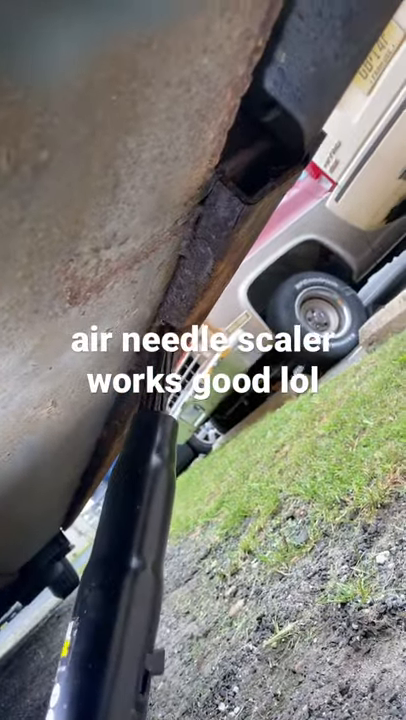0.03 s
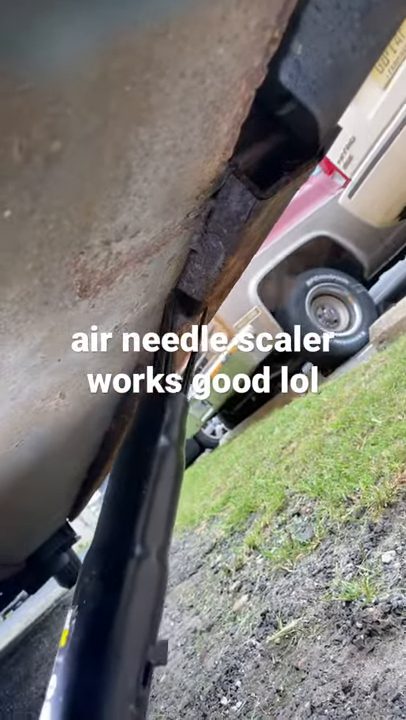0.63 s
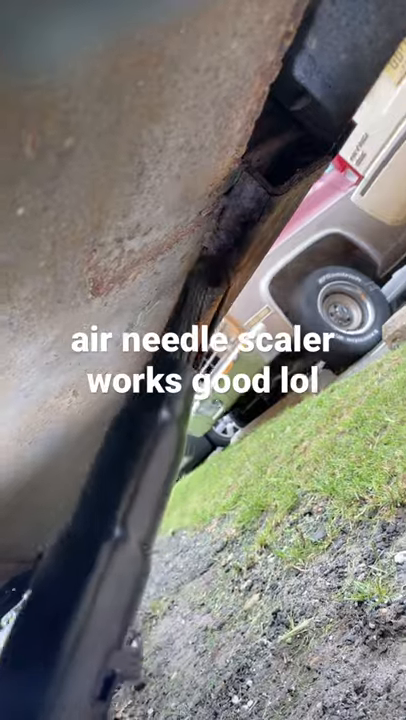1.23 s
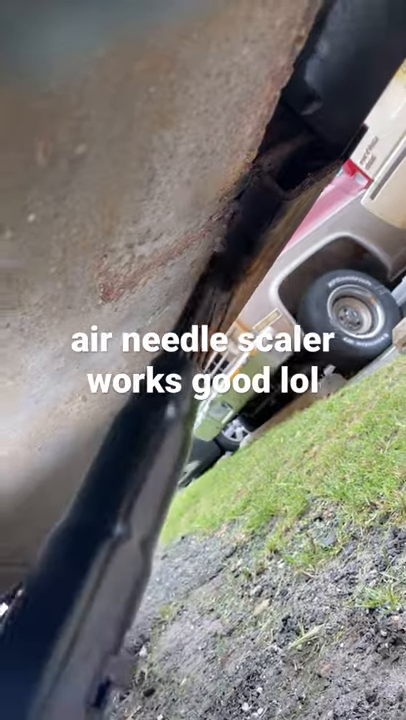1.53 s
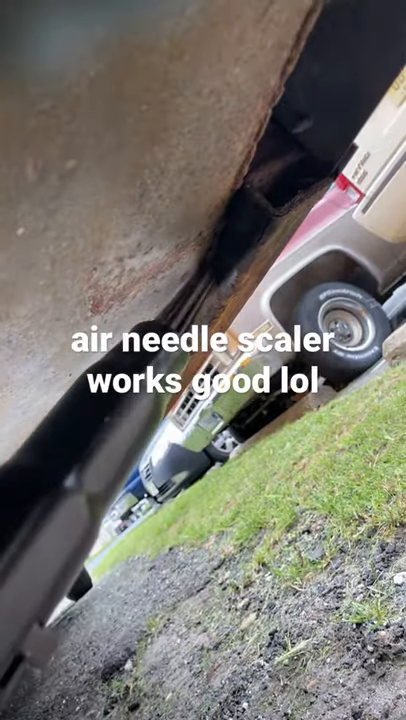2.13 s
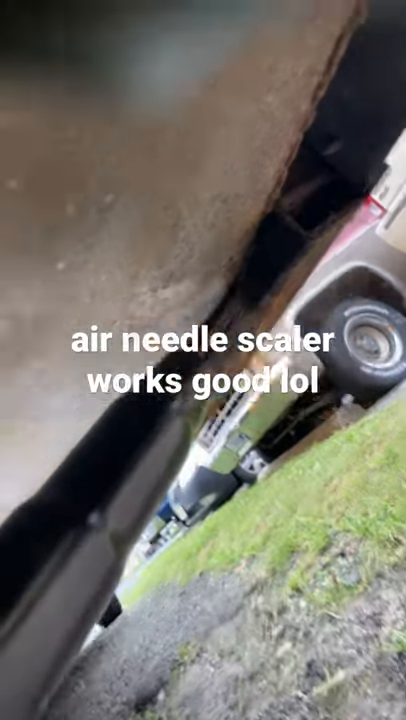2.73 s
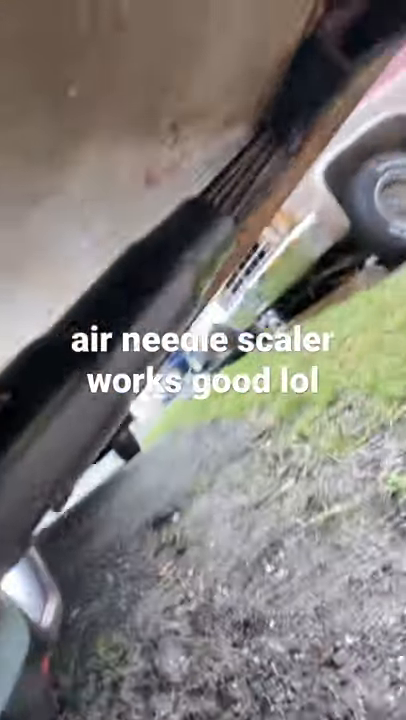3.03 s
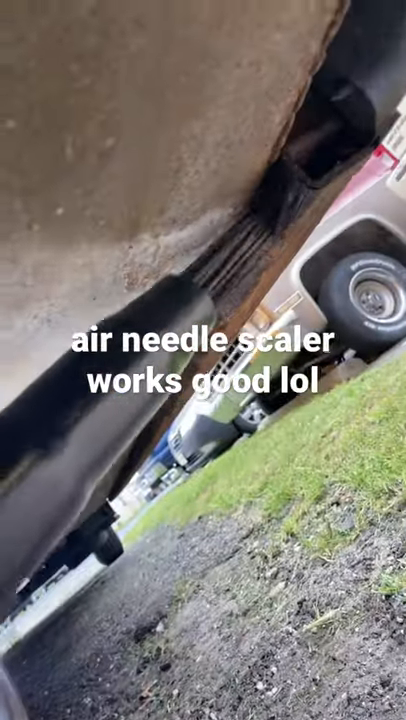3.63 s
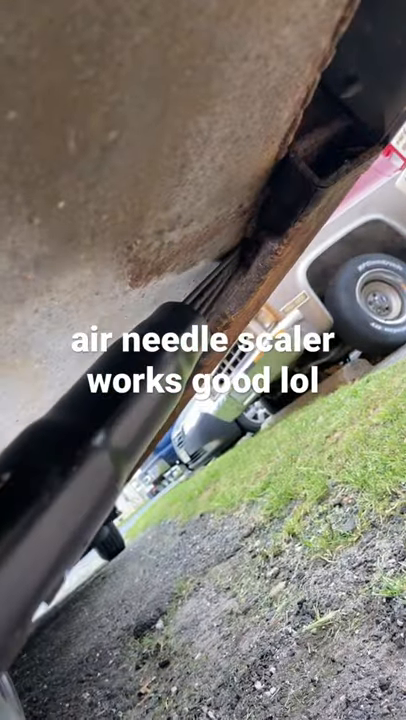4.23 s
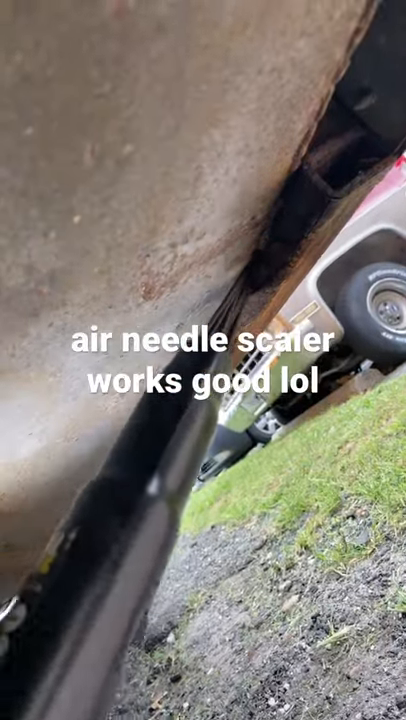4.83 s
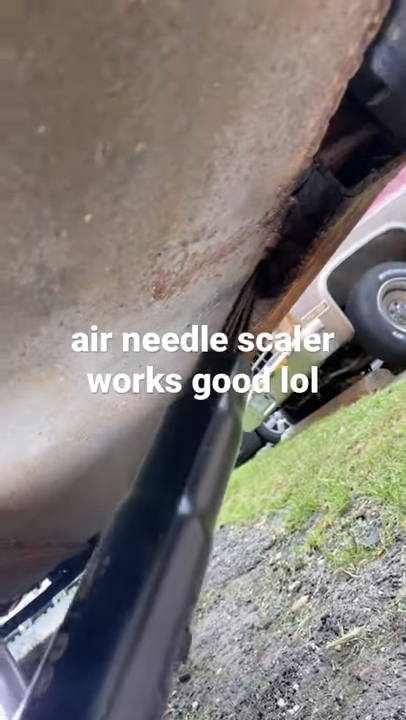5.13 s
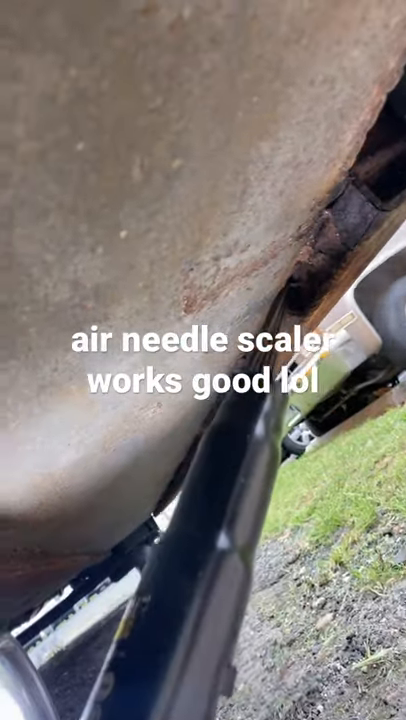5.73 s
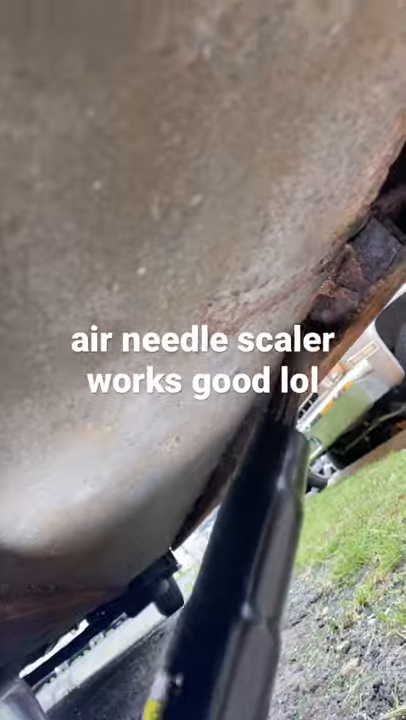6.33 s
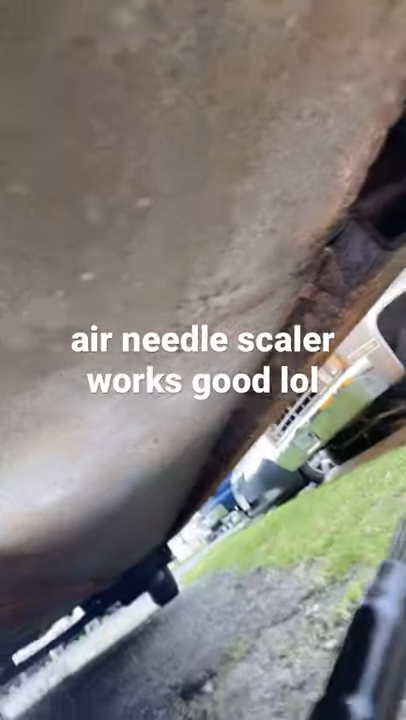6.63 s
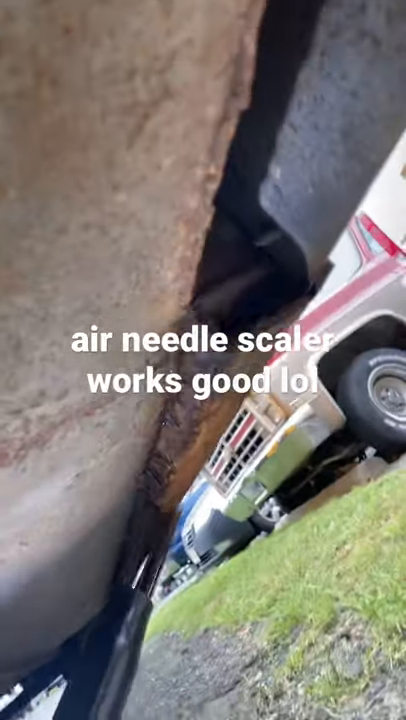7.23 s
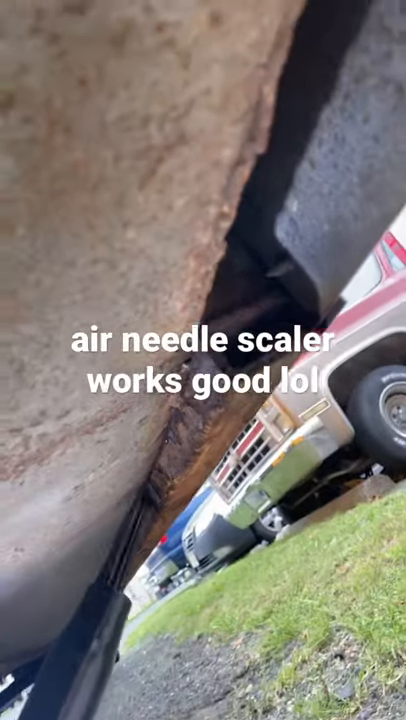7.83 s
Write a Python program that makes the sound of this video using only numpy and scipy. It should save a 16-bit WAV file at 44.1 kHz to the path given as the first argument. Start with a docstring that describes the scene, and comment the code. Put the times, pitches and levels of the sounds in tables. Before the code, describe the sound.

Rapid pneumatic hammering on rusty sheet metal outdoors, with bright needle clatter, hissing air and occasional dull thumps.

```python
"""An air needle scaler chips rust off the underside of a vehicle, outdoors, about an arm's length away.
Its piston strikes about 73 times a second and slows twice as the trigger eases. Each blow knocks the
sheet steel, throws a bundle of ringing needles against it and lets out a puff of air. Now and then
the needles bite and the panel thumps. Behind it are a thin whistle from the valve, faint open-air
noise and, at the very start, a low hum and rumble."""
import sys
import numpy as np
from scipy import signal
from scipy.fft import rfft, irfft, next_fast_len
from scipy.io import wavfile
from scipy.ndimage import uniform_filter1d

SR = 44100
rng = np.random.default_rng(int(sys.argv[2]) if len(sys.argv) > 2 else 0)


def file_out(sig):
    """Save sig as 16-bit WAV at sys.argv[1]."""
    # one column per channel
    cols = np.atleast_2d(sig).T
    # limit, then scale
    lim = np.clip(cols, -1, 1)
    pcm = np.round(lim * 32767).astype(np.int16)
    wavfile.write(sys.argv[1], SR, pcm)


N = 356328
TIME = np.arange(N) / SR

# piston speed during the first pull of the trigger: t/s, rate/Hz
FIRST_PULL_RATE = [(0.106, 42.27), (0.134, 50.74), (0.184, 76.69), (1.009, 74.48), (1.636, 74.46),
                   (1.668, 52.71), (1.735, 31.39)]
# piston speed during the second pull: t/s, rate/Hz
SECOND_PULL_RATE = [(1.816, 70.86), (1.892, 76.77), (2.189, 70.88), (2.245, 73.71), (4.091, 73.51),
                    (5.55, 71.21), (5.653, 70.2), (6.415, 72.18), (6.46, 75.31), (6.725, 72.42),
                    (6.882, 46.14), (6.993, 50.97), (7.061, 76.72), (7.305, 72.46), (8.08, 74.08)]
# limp strokes at low air pressure, next to a full blow: t/s, level/dB
WEAK_TAPS = [(0.079, -8.5), (0.095, -11), (1.765, -12.5), (1.799, -10.5)]
# air stored in the hose drives the first blows of a pull harder: t/s, boost/dB
HOSE_SURGES = [(0.101, 8), (1.812, 1)]
# how the hand holds the tool: t/s, push on the panel/dB, touch on its stiff edge/dB, needle clatter/dB
HAND_CONTACT = [(0.3, -27, -24.5, -25.5), (1.0, -26, -26, -26.5), (1.55, -23, -23.5, -24),
                (2.1, -26.5, -23.5, -26.5), (2.9, -26, -24.5, -26.5), (3.55, -25.5, -26.5, -24),
                (4.1, -26.5, -24.5, -26), (4.85, -26.5, -26, -26), (5.1, -25.5, -26.5, -23),
                (5.75, -25, -27, -23.5), (6.45, -27, -28.5, -24.5), (6.75, -31, -35.5, -25.5),
                (7.05, -31.5, -34, -27.5), (8.07, -32.5, -34, -27.5)]
# the needles dig in, so the panel flexes and the steel rings more: middle/s, half length/s, extra flex/dB
NEEDLE_DIGS = [(3.547, 0.3, 10), (5.8, 0.62, 12), (6.45, 0.049, 11)]
# the needles bite and kick the panel: t/s, relative level/dB
BITE_KICKS = [(0.078, -23), (0.103, -10.5), (0.126, -11), (0.922, -14.5), (1.33, -15.5), (1.383, -16.5),
              (1.514, -15), (1.561, -15.5), (2.432, -19), (2.814, -16.5), (2.939, -15.5), (3.108, -16.5),
              (3.237, -17), (3.371, -19), (3.579, -23), (3.718, -11), (4.011, -14), (4.17, -21),
              (4.625, -14), (4.971, -13), (5.134, -18), (5.304, -22), (5.485, -13.5), (5.558, -13),
              (5.706, -14), (5.761, -21), (6.133, -22), (6.341, -16), (6.43, -19), (6.488, -17)]
# notes that come and go with the tool's angle, mostly of the needles, the two lowest (near 1.4 and 1.5 kHz) of
# the tool's body: start/s, end/s, f/Hz, width/Hz, level/dB; a row that ends before it starts is silent
SHIFTING_NOTES = [(0.1, 1.9, 11900, 1000, -27), (0.1, 2.8, 2880, 200, -39.5), (1.69, 1.79, 10210, 45, -29),
                  (1.8, 2.9, 7470, 121, -29), (0.1, 2.9, 5600, 495, -34), (3.0, 5.0, 4090, 200, -36.5),
                  (3.1, 4.7, 3080, 170, -32.5), (3.4, 3.75, 7510, 120, -28.5), (3.9, 6.5, 1510, 130, -34.5),
                  (4.9, 6.55, 4020, 1000, -37), (4.98, 6.56, 6230, 101, -32), (4.98, 3.3, 7600, 600, -36.5),
                  (6.55, 7.05, 1390, 150, -32), (6.75, 9.0, 2940, 80, -36.5)]
# notes of the tool's own steel: f/Hz, time to fade by 60 dB/s, level/dB
TOOL_NOTES = [(6130, 0.034, -41), (7260, 0.027, -39), (7900, .016, -58), (10250, 0.048, -42.5),
              (11370, 0.016, -41), (12500, .035, -40.5)]
# tone of the wide panel: f/Hz, level/dB
PANEL_TONE = [(200, -26), (385, -25), (430, -3.5), (570, 2), (680, -2), (780, 0), (900, -4.5), (1050, -5),
              (1400, -24.5), (2500, -37)]
# tone of the hammer's knock: f/Hz, level/dB
HAMMER_TONE = [(600, -29), (950, -4), (1150, -4), (1330, -1), (1500, 0), (1750, -7), (2000, -5.5),
               (3000, -38)]
# tone of the stiff edge: f/Hz, level/dB
EDGE_TONE = [(1300, -21), (1850, 17), (2080, 15), (2350, 18), (2700, 15), (3050, 10), (3300, 5),
             (3600, -9.5), (6000, -37.5)]
# deep tone of the flexing panel: f/Hz, level/dB
FLEX_TONE = [(25, -43), (45, -21), (70, -0.5), (140, -1.5), (250, -2), (400, -7.5), (700, -17), (1500, -44)]
# bright clatter of the needle tips: f/Hz, level/dB
CLATTER_TONE = [(2500, -11.5), (3600, -10), (4300, -2.5), (5400, -2), (6200, 2.5), (6900, 0), (7900, 6.5),
                (8700, -4), (10000, -3.5), (13000, -24)]
# their highest sizzle: f/Hz, level/dB
SIZZLE_TONE = [(7000, -28), (9000, -2.5), (10200, -2), (10800, -4.5), (11500, -5), (13000, -5),
               (14000, -9.5), (15800, -18)]
# thump of a bite: f/Hz, level/dB
BITE_TONE = [(25, -31), (45, -15), (80, 0), (150, -3), (300, -9), (600, -9), (1500, -26)]
# open-air noise: f/Hz, level/dB
OUTDOOR_TONE = [(25, -58), (80, 6), (300, 6.5), (900, 4), (2000, 1), (4000, -20), (8000, -25), (15000, -13)]
# rumble at the start: f/Hz, level/dB
RUMBLE_TONE = [(30, -16), (130, -6), (450, -10), (900, -11.5), (3000, -23), (15000, -35)]


def piston(jitter_s=.00007, spread_db=0.72):
    """Air drives the piston: one blow per stroke, plus a few limp taps. Gives their times and sizes."""
    times = []
    for pull in (FIRST_PULL_RATE, SECOND_PULL_RATE):
        s, rate = np.transpose(pull)
        t = TIME[(TIME >= s[0]) & (TIME <= s[-1])]
        strokes = np.cumsum(np.interp(t, s, rate)) / SR
        times.extend(np.interp(np.arange(int(strokes[-1]) + 1), strokes, t))
    tap_s, tap_db = np.transpose(WEAK_TAPS)
    db = np.r_[np.zeros(len(times)), tap_db]
    times = np.r_[times, tap_s]
    timing, force = rng.standard_normal((len(times), 2)).T
    return times + jitter_s * timing, undb(db + spread_db * force)


def needles(times, sizes, count=19, flight_s=.0075, fade_s=0.0059, drift_s=.0003, jitter_s=.00005):
    """Each needle lands after its own flight, which drifts as the tool moves; late ones land softer."""
    lateness = (np.arange(count) + rng.random(count)) / count
    drift, jitter, force = rng.standard_normal((3, len(times), count))
    flight = np.abs(flight_s * lateness ** 1.3 + drift_s * wander(drift) + jitter_s * jitter)
    # a needle leans to one side for a while, then flips over
    lean = np.sign(uniform_filter1d(rng.standard_normal(flight.shape), size=30, axis=0))
    fade = fade_s * 0.53 ** seated(times)[:, None]  # in a seated bundle, late needles are softer still
    push = lean * np.exp(-flight / fade) * undb(3.5 * force)
    push /= np.linalg.norm(push, axis=1, keepdims=True)  # the needles share the energy of one blow
    return unit(clicks(times[:, None] + flight, sizes[:, None] * push))


def rebound(times, sizes, delay_s=.0045, drift_s=0.000896):
    """The bundle falls back on the anvil just after each blow; the delay wanders slowly from blow to blow."""
    drift = wander(rng.standard_normal(len(times)), blows=30)
    return unit(clicks(times + delay_s + drift_s * drift, sizes))


def sheet_steel(times, sizes, landings, panel, hammer, edge, flex, grip_db=4.0, slip_s=0.00019):
    """The blow runs through the sheet as a bending wave, highs first; the needles rattle it after."""
    slip, grip, bend = rng.standard_normal((len(times), 3)).T
    knock = unit(clicks(times, sizes)) + undb(-8.5) * rebound(times, sizes)
    turnaround = unit(clicks(times - 0.003, sizes))  # the piston turns round just before each blow
    knock += undb(-12) * wash(turnaround, t60=0.021)
    rattle = unit(landings + undb(1) * echoes(landings, t60=0.048) + undb(0.5) * wash(landings, t60=0.12))
    # the loose, wide panel never answers twice alike, and the grip on it differs from blow to blow
    shake = unit(undb(-5.5) * landings + wash(landings, t60=0.029))
    shove = unit(clicks(times + slip_s * slip, sizes * undb(grip_db * grip)))
    heave = unit(clicks(times, sizes * (1 + 2.5 * bend)))
    out = panel * unit(colour(shove + undb(-0.5) * shake, PANEL_TONE, lag=0.97))
    out += hammer * unit(colour(knock + undb(-2) * rattle, HAMMER_TONE, lag=0.41))
    out += edge * unit(colour(knock + undb(2) * rattle, EDGE_TONE, lag=0.37))
    return out + flex * unit(colour(heave + undb(-5) * shake, FLEX_TONE, lag=1.223))


def needle_tips(times, sizes, landings, bounces, air, clatter, sizzle, seated_db=5):
    """The tips crack on the rust and bounce, mixed with the hiss of spent air."""
    # needles already resting on the steel crack right at the blow, harder when the bundle is seated
    blows = unit(clicks(times, sizes * undb(seated_db * seated(times))))
    strikes = unit(undb(-5.5) * blows + landings + undb(6.5) * echoes(landings, t60=0.0041))
    tail = undb(1.5) * echoes(landings, t60=0.071)
    chatter = undb(-4) * wash(bounces, t60=0.036)
    cracks = unit(strikes + tail + undb(-1) * air + chatter)
    return clatter * unit(colour(cracks, CLATTER_TONE)) + sizzle * unit(colour(cracks, SIZZLE_TONE))


def ringing_steel(landings, needle_gain, tool_gain, fade_s=0.058):
    """Every landing sets the needles and the tool ringing at their own notes."""
    crack = unit(wash(landings, t60=0.0022))
    out = np.zeros(N)
    for start, end, hz, width, db in SHIFTING_NOTES:
        near_note = ring(crack, hz, 4 * width)  # each note takes up only the sound near itself
        out += undb(db) * needle_gain * gate(TIME, start, end, fade_s) * ring(near_note, hz, width)
    for hz, t60, db in TOOL_NOTES:
        out += undb(db) * ring(tool_gain * crack, hz, width_hz=np.log(1000) / (np.pi * t60))
    return out


def exhaust(times, sizes, puff_s=0.016):
    """A puff of air leaves the tool on every stroke and dies away."""
    puffs = signal.lfilter([1], [1, -np.exp(-1 / (puff_s * SR))], clicks(times, sizes))
    return unit(puffs * rng.standard_normal(N))


def bites():
    """A hard kick bends the whole panel: a thump that falls in pitch and shudders on."""
    s, db = np.transpose(BITE_KICKS)
    kicks = clicks(s, undb(db))
    shudder = ring(wash(kicks, t60=0.13), hz=156, width_hz=320)
    thumps = unit(colour(kicks, BITE_TONE, lag=1.323, slowest_hz=40.6))
    return undb(-38) * thumps + undb(-39.5) * shudder


def air_supply(full_rate_hz=71.3, run_up_s=0.18, surge_s=0.12):
    """How far the piston has slowed for lack of air (octaves), and the hose's fading boost (dB)."""
    rate = np.interp(TIME, *np.transpose(np.r_[FIRST_PULL_RATE, SECOND_PULL_RATE]))
    slowing = np.maximum(np.log2(full_rate_hz / rate), 0) * (TIME > run_up_s)
    surge = sum(db * (TIME >= s) * np.exp(-np.abs(TIME - s) / surge_s) for s, db in HOSE_SURGES)
    return slowing, surge


def loudness():
    """Air pressure and the hand's hold set how loud each part is: added up in dB, returned as gains."""
    s, *columns = np.transpose(HAND_CONTACT)
    push, touch, tips = (np.interp(TIME, s, c) for c in columns)
    more_push, more_touch, more_tips = (c - c.mean() for c in (push, touch, tips))
    dig = sum(db * np.exp(-((TIME - middle) / half) ** 2) for middle, half, db in NEEDLE_DIGS)
    slowing, surge = air_supply()
    panel_air = 0.45 * surge - 20 * slowing  # less air, weaker blows: 20 dB lost at half speed
    needle_air = surge - 7 * slowing
    panel = push + panel_air
    hammer = -26 + 0.63 * more_push + surge - 3.5 * slowing
    edge = touch + surge - 9 * slowing
    flex = -43.5 + 1.36 * more_push + dig + panel_air
    clatter = tips + needle_air
    sizzle = -24.5 + 0.35 * more_tips + 0.094 * more_touch + needle_air
    rings = 0.27 * dig + needle_air
    return undb([panel, hammer, edge, flex, clatter, sizzle, rings])


def seated(times):
    """0 while the bundle skates loosely, 1 while it sits square on the steel."""
    return gate(times, start=4.86, end=6.24, fade_s=0.17)


def valve_leak(hz=7900, width_hz=180, db=-51):
    """Air whistles thinly past the trigger valve."""
    hiss = ring(rng.standard_normal(N), hz, width_hz)
    return undb(db) * ring(hiss, hz, width_hz)


def surroundings(air_db=-46, hum_hz=215.6, hum_db=-31, rumble_db=-31, end_s=0.116):
    """Faint open-air noise throughout; a low hum and rumble stop as the tool starts."""
    open_air = undb(air_db) * unit(colour(rng.standard_normal(N), OUTDOOR_TONE))
    rumble = undb(rumble_db) * unit(colour(rng.standard_normal(N), RUMBLE_TONE))
    hum = undb(hum_db) * unit(np.sin(2 * np.pi * hum_hz * TIME))
    early = np.clip((end_s - TIME) / 0.016, 0, 1)
    return open_air + early * (hum + rumble)


def undb(db):
    """Turn decibels into a number to multiply by."""
    return 10 ** (np.asarray(db) / 20)


def unit(x):
    """Scale to an average (rms) level of 1."""
    return x / np.sqrt(np.mean(x ** 2))


def gate(t, start, end, fade_s):
    """Fade from 0 up to 1 around start, and back down around end."""
    return np.clip(np.minimum(t - start, end - t) / fade_s + .5, 0, 1)


def wander(noise, blows=25):
    """Smooth random numbers over many blows into a slow drift."""
    return unit(uniform_filter1d(uniform_filter1d(noise, blows, axis=0), blows, axis=0))


def clicks(times, sizes):
    """One sharp click at each time."""
    samples = np.clip(np.ravel(times) * SR, 0, N).astype(int)
    return np.bincount(samples, np.ravel(sizes), N + 1)[:N]


def ring(x, hz, width_hz):
    """Let x ring at one note, scaled to level 1; a narrower note rings longer."""
    r = np.exp(-np.pi * width_hz / SR)
    return unit(signal.lfilter([1, 0, -1], [1, -2 * r * np.cos(2 * np.pi * hz / SR), r * r], x))


def colour(x, tone, lag=0., slowest_hz=38.5):
    """Shape x with a tone table; lag makes the lows arrive after the highs, as in sheet steel."""
    size = next_fast_len(N + SR // 4, True) // 2 * 2
    hz = np.arange(1025) * SR / 2048
    tone_hz, tone_db = np.transpose(tone)
    gain = undb(np.interp(np.log(hz + 1), np.log(tone_hz), tone_db))
    # build a filter that never sounds before it is struck (minimum phase)
    cepstrum = irfft(np.log(gain))
    one_sided = np.r_[cepstrum[0], 2 * cepstrum[1:1024], np.zeros(1024)]
    response = irfft(np.exp(rfft(one_sided)))
    late_cycles = lag * np.log(1 + np.fft.rfftfreq(size, 1 / SR) / slowest_hz)
    return irfft(rfft(x, size) * rfft(response, size) * np.exp(-2j * np.pi * late_cycles))[:N]


def wash(x, t60):
    """A blur of reflections, new after every blow, that fades by 60 dB in t60 seconds."""
    keep = np.exp(-2 * np.log(1000) / (t60 * SR))
    energy = signal.lfilter([1 - keep], [1, -keep], x ** 2 + 1e-18)
    return np.sqrt(energy) * rng.standard_normal(N)


def echoes(x, t60, size=16384):
    """Dense echoes inside the steel; their pattern changes gradually as the tool travels."""
    hop, t = size // 2, TIME[:size // 4]
    pieces = np.lib.stride_tricks.sliding_window_view(np.pad(x, (hop, size)), size)[::hop]
    pieces = pieces * np.hanning(size) ** .5
    patterns = rng.standard_normal((len(pieces), len(t))) * np.exp(-np.log(1000) * t / t60)
    patterns /= np.linalg.norm(patterns, axis=1, keepdims=True)
    out = np.zeros(N + 3 * size)
    for k, piece in enumerate(signal.fftconvolve(pieces, patterns, axes=1)):
        out[k * hop:k * hop + len(piece)] += piece
    return out[hop:hop + N]


def scene():
    """The piston drives the panel, the needles and the exhaust; bites and background join them."""
    times, sizes = piston()
    landings = needles(times, sizes)
    air = exhaust(times, sizes)
    loose_sizes = sizes * (1 - seated(times))  # seated tips do not bounce
    bounces = rebound(times, loose_sizes, delay_s=.0055, drift_s=0.00048)
    panel, hammer, edge, flex, clatter, sizzle, rings = loudness()
    scaler = sheet_steel(times, sizes, landings, panel, hammer, edge, flex)
    scaler += needle_tips(times, sizes, landings, bounces, air, clatter, sizzle)
    scaler += ringing_steel(landings, needle_gain=rings, tool_gain=sizzle)
    return (scaler + bites() + valve_leak() + surroundings())[None]


def record(dry, ceiling=0.85, bottom_hz=42, top_hz=15850):
    """Round off the loudest peaks, then cut the deepest bass and the highest treble."""
    rounded = ceiling * np.tanh(dry / ceiling)
    sound = signal.sosfilt(signal.butter(3, bottom_hz, "highpass", fs=SR, output="sos"), rounded)
    return signal.sosfilt(signal.ellip(10, .2, 70, top_hz, fs=SR, output="sos"), sound)


dry = scene()
out = record(dry)
file_out(out)
```